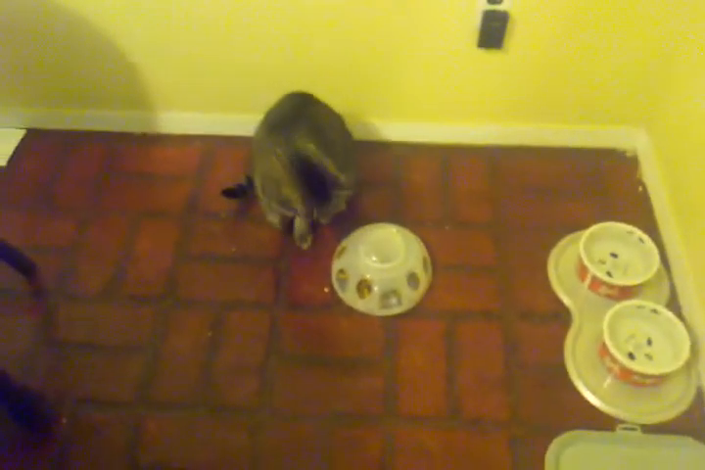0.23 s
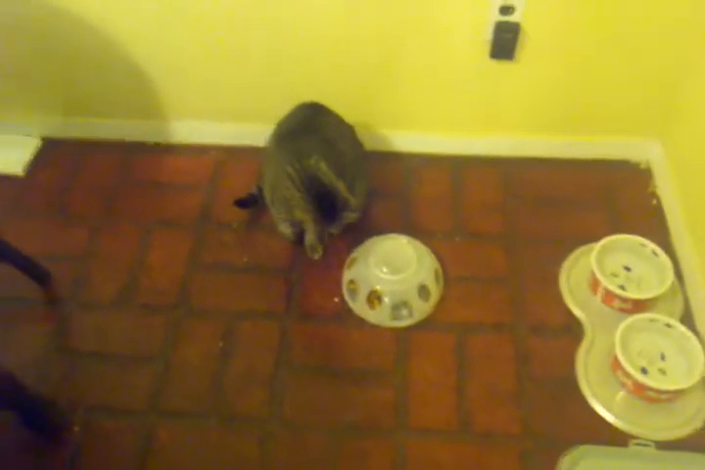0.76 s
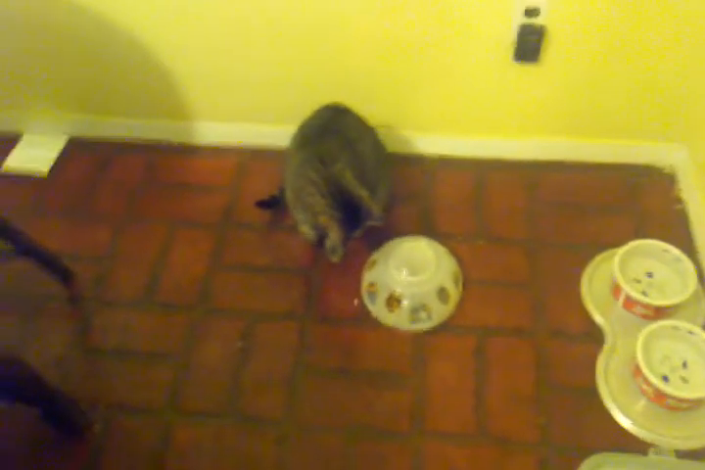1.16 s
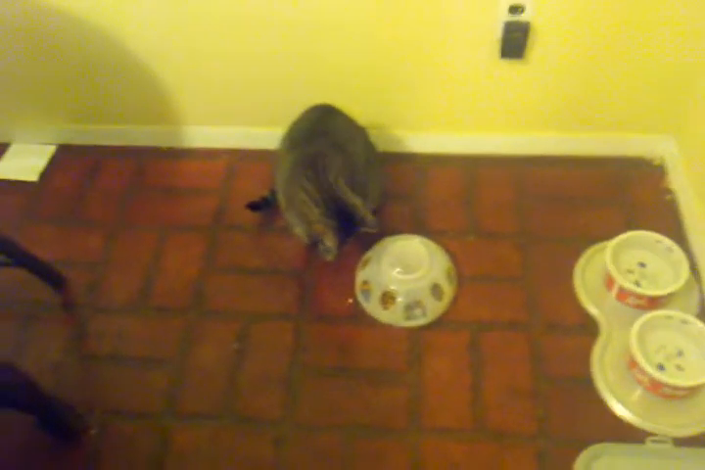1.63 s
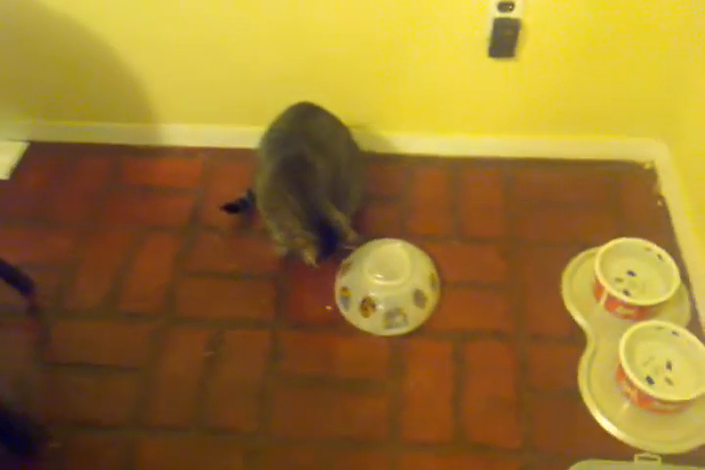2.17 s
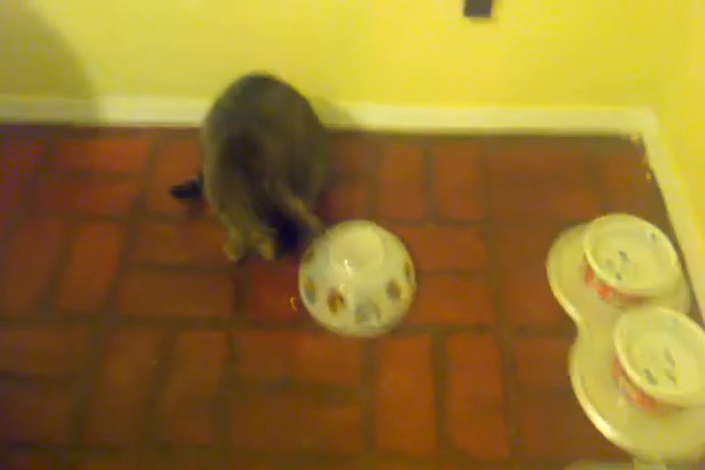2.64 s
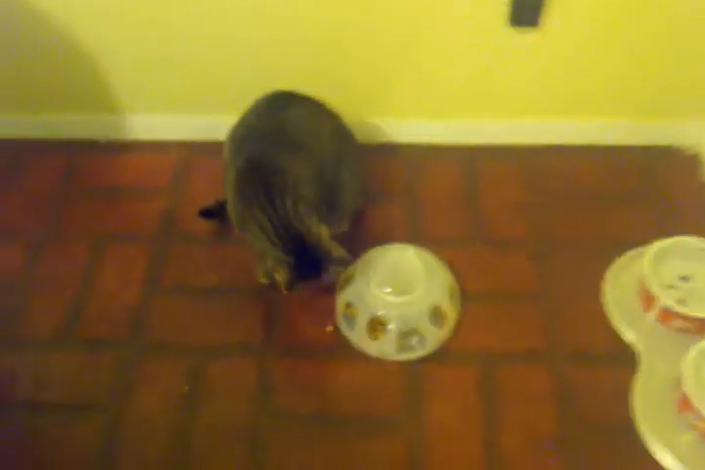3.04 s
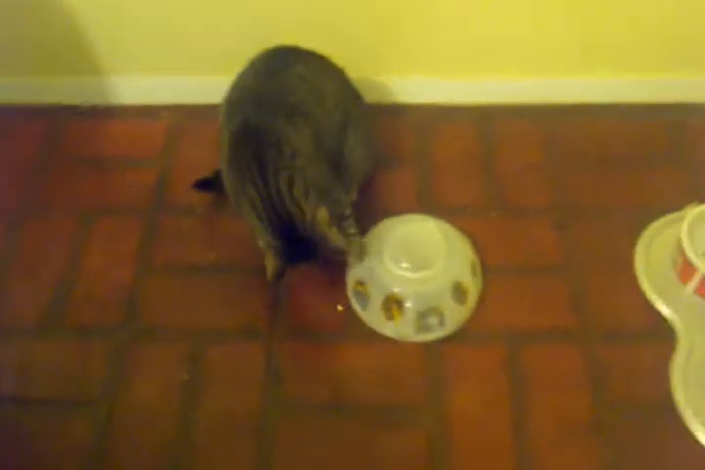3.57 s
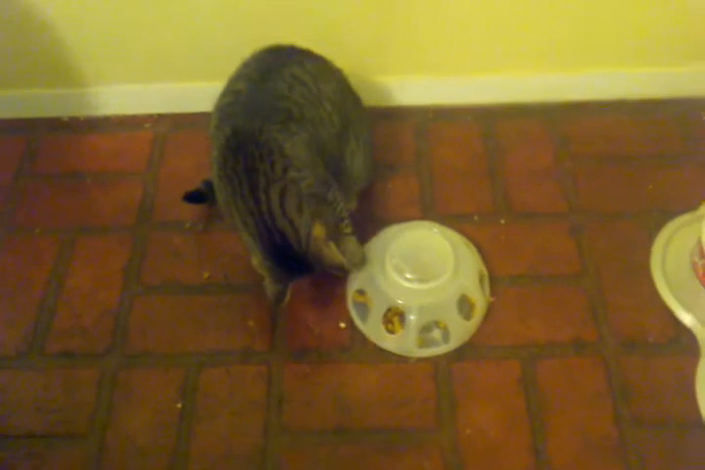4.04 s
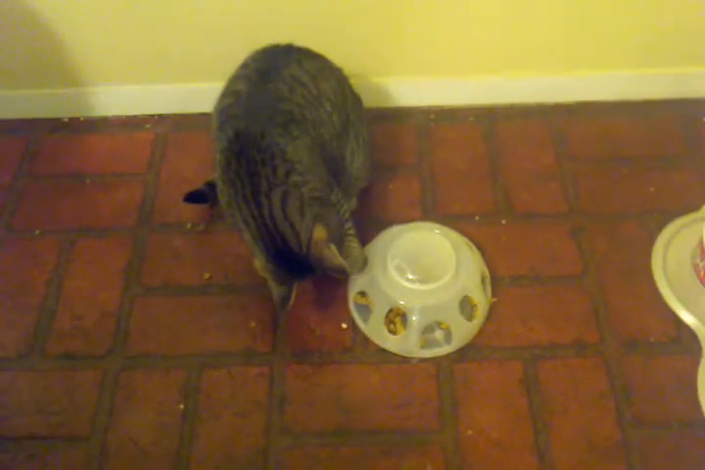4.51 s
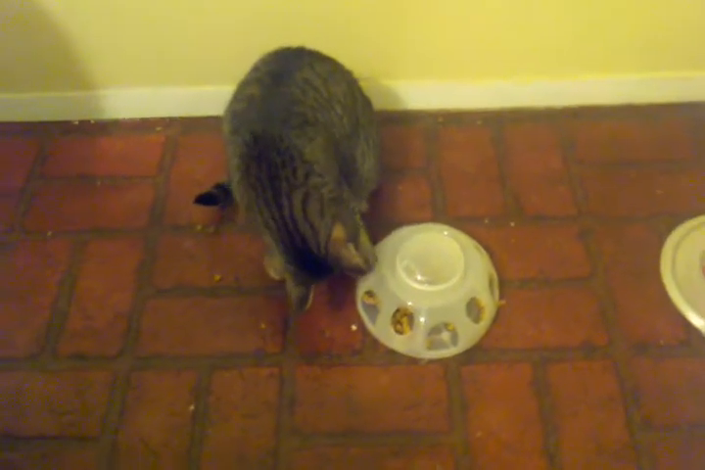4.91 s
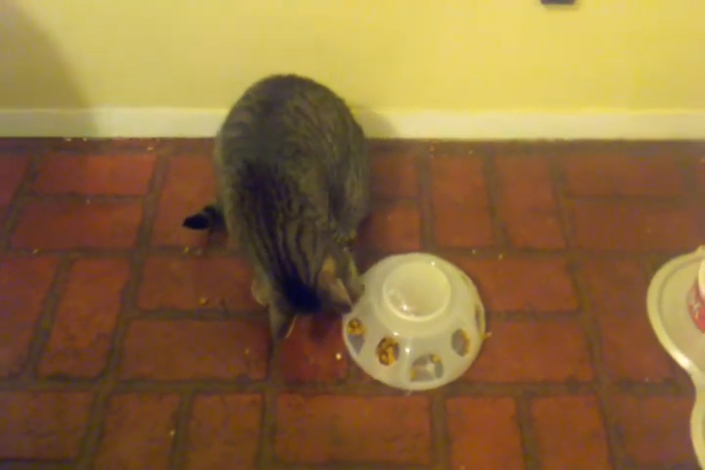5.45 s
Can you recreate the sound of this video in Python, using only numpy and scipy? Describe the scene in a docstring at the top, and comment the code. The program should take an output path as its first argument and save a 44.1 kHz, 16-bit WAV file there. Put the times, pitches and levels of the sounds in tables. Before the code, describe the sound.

Fingers rub and tap close on a camera's case, then a cat crunches dry kibble a little way off in a small room.

```python
"""A hand slides and taps on the camera's case, close and dry, over the faint hiss of two tiny microphones.
Then a cat cracks dry kibble a little way off: each bite is shaped noise that rings pellet and mouth resonances,
with crumbs snapping on and the small room ringing briefly. Skin noise rubs and knocks excite the case's modes.
The camera widens its stereo by subtracting from each port a delayed copy of the other."""
import sys
import numpy as np
from scipy import signal
from scipy.fft import rfft, irfft
from scipy.io import wavfile

SR = 44100
rng = np.random.default_rng(int(sys.argv[2]) if len(sys.argv) > 2 else 0)


def persist_wave(psi):
    """Save psi, clipped to +-1, as 16-bit WAV."""
    counts = np.round(np.clip(psi, -1, 1) * 32767).astype(np.int16)
    wavfile.write(sys.argv[1], SR, np.atleast_2d(counts).T)


N = 250929
T = np.arange(N) / SR  # time (s)
TOP_HZ = 14100  # upper edge of the camera's sound

# resonances that every crunch rings with: f/Hz, width/Hz, relative level/dB
CRUNCH_MODES = [(650, 170, -2.5), (1110, 175, 4.5), (1500, 240, 5), (2115, 190, 7.5)]
# spectrum of a pellet's crack: f/Hz, relative level/dB
CRACK_SPECTRUM = [(1200, -76), (2200, -0.5), (3000, 0.5), (3900, 5), (5200, 2), (6300, 3.5), (8500, -1.5),
                  (10500, -13), (14000, -21)]


def crunches(split_s=0.0014, crumb_s=0.028, crumbs_per_s=1600, strain_s=0.009, chunky_db=2.5,
             detune=0.036, uneven_db=2.5, size=6144):
    """A strained pellet crackles, splits in a short noise burst, then crumbles; split and crumbs ring differently."""
    # bites on a pellet: t/s, hollow ring/dB, mouth resonance f/Hz, crack/dB,
    # crispness/(dB per octave), crumbling/dB re the split
    bites = [(3.494, -49.5, 1850, -54.5, -1, -7), (3.705, -37, 1150, -43, -2, 4),
             (3.717, -51, 1060, -45, 22, -9), (3.7331, -42.5, 2270, -40.5, -4, -22),
             (4.183, -49.5, 955, -45.5, 9, -1.5), (4.218, -62, 2000, -54, -21, -8),
             (4.272, -72, 2100, -53, -9, -8), (4.297, -47.5, 2100, -39, 9.5, -25),
             (4.3314, -54, 1920, -50.5, -11, -1), (4.391, -38.5, 1330, -54, 9, -24),
             (4.417, -50, 1200, -48, -4, 0), (4.4296, -48, 1110, -61, -2, -23),
             (4.4523, -52, 1110, -47.5, 6, 0), (4.6158, -46, 1940, -59, 9, -8),
             (4.629, -55.5, 1146, -55, -6, 2), (4.7197, -54, 1680, -50, -1.5, -7),
             (4.7823, -44.5, 1500, -42, 4, -13), (4.8689, -45, 2100, -49.5, -8, -16),
             (4.888, -51.5, 1500, -48.5, -3, 10), (4.8988, -46.5, 1260, -54.5, 4, 4),
             (4.9413, -63, 1730, -54, -10, -5), (5.0743, -40.5, 1100, -45.5, -12, -3),
             (5.0806, -40, 1400, -37.5, 3, -13), (5.2486, -53.5, 2200, -49, 0, -4),
             (5.2952, -47.5, 1950, -45.5, 2, -7.5), (5.301, -43, 1210, -48, 0, -27),
             (5.5052, -52, 1330, -54.5, -9, 6), (5.568, -45, 1610, -43.5, -4.5, 3),
             (5.5768, -40, 1490, -44, 6, 0), (5.682, -45, 1200, -51, -5, 2.5)]
    accent_peak_db, accent_octaves = 8, 0.35  # the mouth lifts the modes near its resonance
    crack_pivot_hz = 5530  # crispness tilts the crack about this
    lead_s = .024  # room for the crackle ahead of the split
    out = np.zeros((1, N))
    t = T[:size] - lead_s
    crack_hz, crack_shape_db = np.transpose(CRACK_SPECTRUM)
    hz, width, mode_db = np.transpose(CRUNCH_MODES)
    split_swell = np.maximum(t, 0) * np.exp(-abs(t) / split_s)
    crumbling = np.exp(np.minimum(t / strain_s, -t / crumb_s))
    for s, ring_db, mouth_hz, crack_db, crisp_db, crumb_db in bites:
        split, crumb, chunk = rng.standard_normal((3, size))
        crumb *= undb(chunky_db * chunk * (t > 0))
        crumb *= rng.random(size) < crumbs_per_s / SR
        octaves_off = np.log2(hz / mouth_hz)
        accent_db = accent_peak_db * np.exp(-(octaves_off / accent_octaves) ** 2)
        crisp_octaves = np.log2(np.clip(crack_hz / crack_pivot_hz, .5, 1.4))
        crack_dbs = crack_shape_db + crisp_db * crisp_octaves
        hollow, crack = 0, 0
        for force, share in (split * split_swell, 1), (crumb * crumbling, undb(crumb_db)):
            shift, strength = rng.standard_normal((2, len(hz)))
            mode_dbs = mode_db + accent_db + uneven_db * strength
            pellet = modes(zip(hz * (1 + detune * shift), width, mode_dbs))
            uneven_dbs = crack_dbs + uneven_db * rng.standard_normal(len(crack_hz))
            hollow += share * unit(ring(force, pellet))
            crack += share * unit(ring(force, colour(list(zip(crack_hz, uneven_dbs)))))
        add(out, s - lead_s, blow(hollow, ring_db) + blow(crack, crack_db))
    return out


def chewing(start_s=4.15, hollow_db=-62, crack_db=-66, snap_s=.0015):
    """Crumbs keep snapping after the start: sparse noise bursts, each hollow and crisp in uneven measure."""
    crumbs_per_s, spread_db = 22, 3
    snaps = (rng.random(N) < crumbs_per_s / SR) * (T > start_s)
    sizes = undb(spread_db * rng.standard_normal((2, N)))
    force = ring(snaps * sizes, blow(T * np.exp(-T / snap_s), 0))
    hollow, crack = force * rng.standard_normal((2, N))
    hollow = undb(hollow_db) * ring(hollow, modes(CRUNCH_MODES))
    return hollow + undb(crack_db) * ring(crack, colour(CRACK_SPECTRUM))


def room(x, wet_db=-3, early_db=-7, early_s=0.0064, port_hz=4500, size=22050):
    """Direct sound from straight ahead, dense early echoes and a short tail; the ports differ more in the treble."""
    # decay of the room: f/Hz, time to fall by 60 dB/s
    room_decay = [(500, 0.24), (1300, 0.3), (6000, 0.4)]
    t, tail = T[:size], 0
    hz = np.fft.rfftfreq(size, 1 / SR)
    noise = rfft(rng.standard_normal((2, size)))
    centres, t60 = np.transpose(room_decay)
    for share, decay in zip(np.eye(len(t60)), t60):
        band = np.interp(np.log(hz + 1), np.log(centres), share)
        tail = tail + irfft(noise * band) * 1000 ** (-t / decay)
    early = rng.standard_normal((2, size)) * np.exp(-t / early_s) * (t > .001)
    echoes = undb(wet_db) * unit(tail * (t > .005)) + undb(early_db) * unit(early)
    likeness = np.sinc(hz / port_hz)  # of diffuse sound at the two ports
    mid_side = np.sqrt(np.array([1 + likeness, 1 - likeness]) / 2)
    response = irfft(rfft(echoes) * mid_side)
    response[0, 0] += 1  # the direct sound, in mid alone
    return ring(x, response)


def eating_at_ports():
    """Crunches and crumbs in the room, as mid and side; sound from the floor reaches the two ports unequally."""
    # colour of the difference between the ports: f/Hz, relative level/dB
    port_mismatch = [(500, 1), (1200, 0.5), (2200, 11), (3300, 1.5), (6000, 6.2), (12000, 1)]
    mismatch_db = -6.5
    eating = room(crunches() + chewing())
    eating[1] -= ring(eating[0], colour(port_mismatch))[0] * undb(mismatch_db)
    return eating


def rubbing():
    """Skin catches and slips on the case: fine hiss at the ports, coarser rustle through the shell, a short rasp."""
    # strokes of skin over the case: start t/s, length/s, fastest at this share of the length,
    # hiss/dB and case rustle/dB, both ahead of the skin's and shell's own gains
    strokes = [(0.246, 0.12, 0.033, -44.5, -59), (0.324, 0.19, 0.5, -50, -52),
               (0.514, 0.36, 0.14, -33.5, -50), (0.54, 0.058, 0.15, -26.5, -60),
               (0.79, 0.29, 0.63, -39, -43), (0.987, 0.1, 0.63, -50, -43.5),
               (1.108, 0.15, 0.18, -44.5, -53.5), (1.332, 0.15, 0.53, -58, -66),
               (1.498, 0.22, 0.56, -50, -56.5), (1.661, 0.1, 0.63, -34, -52),
               (1.699, 0.25, 0.41, -44.5, -55), (1.884, 0.3, 0.5, -38, -48.5),
               (1.952, 0.11, 0.14, -41, -51), (2.154, 0.2, 0.71, -42, -50), (2.358, 0.082, 0.6, -54, -67),
               (2.381, 0.24, 0.73, -53.5, -61.5), (2.647, 0.12, 0.75, -59.5, -68),
               (2.847, 0.75, 0.38, -60, -65)]
    # hiss of sliding skin at the two ports: f/Hz, relative level/dB in their sum, in their difference
    skin_spectra = [(1100, -21.5, -23), (2000, -5, -2.5), (3410, -45, -7.5), (3445, -6.5, -1),
                    (4980, -7.5, -0.5), (5900, 4, -2.5), (6920, -0.5, 8), (8930, 6.5, 5), (10130, -7.5, 0),
                    (11800, -2, -2.5), (13000, -10, -6)]
    # what the thin shell passes: f/Hz, relative level/dB
    shell = [(2600, 7), (3300, -79), (4500, 5.5), (8000, -2)]
    # what the rubbed case rings with: f/Hz, width/Hz, level/dB before it wanders
    case_modes = [(342, 280, -15.5), (600, 133, -9), (1243, 650, -3), (1520, 440, -1), (2100, 1730, 1),
                  (2380, 5100, -3.5)]
    # what a rasping fingertip rings with: f/Hz, width/Hz, relative level/dB
    rasp_modes = [(1500, 100, -10), (3920, 400, -2), (8040, 490, 6.5), (10400, 700, -16), (13000, 510, -4)]
    hiss_law, rustle_law = 1.67, 1.1  # growth with the speed of a stroke (exponents)
    # a stronger stroke hisses brighter: neutral level (dB), tilt gained (dB per octave per dB), pivot (Hz)
    firm_db, brightening, pivot_hz = -48, 0.15, 7500
    patchy_db = 1.2  # each stroke finds another patch of skin and case: spread of its colour
    # a fingertip grips harder and rasps once
    rasp_start_s, rasp_length_s, rasp_peak, rasp_db = 1.668, 0.094, 0.67, -33

    hiss, rustle_power, rasp_level = np.zeros((2, N)), np.zeros(N), np.zeros(N)
    fine = grains(per_s=9000, spread_db=-1.1) * undb([[2.5], [1.5]])  # mid, side (dB)
    skin_hz, *skin_dbs = np.transpose(skin_spectra)
    for start_s, length_s, peak, hiss_db, rustle_db in strokes:
        speed = stroke(length_s, peak)
        bright_db = brightening * (hiss_db - firm_db) * np.log2(skin_hz / pivot_hz)
        tint_db = bright_db + patchy_db * rng.standard_normal(len(skin_hz))
        skin = np.array([colour(list(zip(skin_hz, db + tint_db))) for db in skin_dbs])
        patch = np.roll(fine, rng.integers(N), axis=1)[:, :len(speed)]
        add(hiss, start_s, ring(patch, skin) * undb(hiss_db) * speed ** hiss_law)
        add(rustle_power, start_s, (undb(rustle_db) * speed ** rustle_law) ** 2)

    slips = ring(grains(per_s=3000, spread_db=0.5), colour(shell)) * undb([[-5.5], [-6.2]])
    rustle = 0
    # the contact point travels, so the modes of the shell come and go
    for k, (hz, width, db) in enumerate(case_modes):
        rustle = rustle + (-1) ** k * ring(slips, modes([(hz, width, 0)])) * undb(db + walk(7.4))

    add(rasp_level, rasp_start_s, undb(rasp_db) * stroke(rasp_length_s, rasp_peak) ** hiss_law)
    rasp = ring(grains(per_s=13000, spread_db=0.0) * stick_slip(), modes(rasp_modes))
    rasp = rasp * undb([[0], [-3]]) * rasp_level
    grip_db = 1.0 * walk(110)
    return (drift(hiss + rustle * np.sqrt(rustle_power)) + rasp) * undb(grip_db)


def stroke(length_s, peak):
    """Speed of a sliding finger, 0-1: it breaks loose, is fastest near a share of the way and stops."""
    break_loose_s = 0.012
    t = T[:int(length_s * SR)]
    warp = np.log(.5) / np.log(np.clip(peak, .02, .95))  # puts the top of the sine at the peak
    swing = np.sin(np.pi * (t / length_s) ** warp)
    return swing * (1 - np.exp(-t / break_loose_s))


def stick_slip():
    """Uneven saw of the gripping fingertip: each slip starts at once and dies away; rms near one."""
    slips_per_s, jitter = 190, .3
    slip_share = .55  # decay of a slip, as a share of its cycle
    rate = slips_per_s * np.exp(jitter * walk(slips_per_s))
    phase = np.cumsum(rate) / SR % 1
    return unit(np.exp(-phase / slip_share)) * np.sqrt(N)


def grains(per_s, spread_db):
    """Dense tiny slips of uneven size, as mid and side at the ports; rms near one."""
    hits = (rng.random((2, N)) < per_s / SR) * rng.choice([-1, 1], (2, N))
    sizes = undb(spread_db * np.minimum(rng.exponential(size=(2, N)), 4))
    return unit(hits * sizes) * np.sqrt(N)


def taps(chatter_db=-8, chatter_s=0.005, tick_s=0.0093, snap_db=-3, bend_s=0.00125, size=2048):
    """A fingertip knocks the case, which chatters and thumps; the skin snaps, then hisses as it slips."""
    # finger taps and slips: t/s, then levels/dB ahead of the port gains: knock, tick, lower thump, upper thump
    tap_rows = [(0.23, -68, -72, -68, -60), (0.2532, -52.5, -44, -56, -55.5),
                (.541, -40.5, -32.5, -85, -58), (0.7608, -53, -43.5, -82, -69), (.847, -58, -70, -55, -63),
                (0.8596, -45, -66, -59, -50), (1.198, -47, -70, -71, -69), (1.21, -47.5, -77, -53.5, -56.5),
                (1.228, -48, -75, -53, -61), (1.262, -48.5, -64, -55, -58.5),
                (1.3046, -52, -80, -67, -55.5), (1.4725, -49, -43.5, -88, -70),
                (1.611, -51.5, -53, -51, -61), (1.9572, -42, -38.5, -52, -86), (2.073, -36, -54, -62, -68),
                (2.108, -38, -37.5, -69, -82), (2.1593, -37, -37, -64, -75), (2.223, -35, -33, -52, -63),
                (2.2933, -36.5, -37, -50, -74), (2.35, -67, -46, -72, -85), (2.4215, -74, -55, -78, -84),
                (3.877, -46, -51, -75, -58)]
    # spectrum of a knock on the case: f/Hz, relative level/dB
    case_knock = [(80, 17.5), (250, -1), (550, 10.5), (900, 6.5), (1400, 7), (2000, 10), (2700, 2),
                  (3400, -11.5), (4500, -22), (8000, -7)]
    # spectrum of the tick of slipping skin: f/Hz, relative level/dB
    tick_spectrum = [(1500, -14), (3000, 8), (4600, 6), (6300, 16), (8200, 12), (11000, 2), (14000, 10)]
    # the two lowest modes of the case, which a tap sets ringing: f/Hz, width/Hz
    thump_modes = [(315, 110), (660, 100)]
    # a harder tap is brighter: neutral knock level (dB), tilt gained (dB per octave per dB)
    firm_db, brightening = -34.5, 0.35
    out, t = np.zeros((2, N)), T[:size]
    tick = colour(tick_spectrum)
    # bending waves in the shell: the lows travel slower and arrive last (bend_s is the travel time at 1 kHz)
    hz_bins = np.fft.rfftfreq(size, 1 / SR)
    travel = np.exp(-4j * np.pi * bend_s * np.sqrt(1000 * hz_bins))
    for s, knock_db, tick_db, *thump_dbs in tap_rows:
        chatter, slip = rng.standard_normal((2, 2, size))
        chatter = unit(chatter * np.exp(-t / chatter_s) * (t > .0015))
        push = (t == 0) + undb(chatter_db) * chatter
        case = colour(tilt(case_knock, brightening * (knock_db - firm_db)))
        knock = ring(irfft(rfft(push) * travel), case)
        add(out, s - bend_s / 2, blow(knock, knock_db) * undb([[4.0], [2.5]]))
        for (hz, width), db in zip(thump_modes, thump_dbs):
            add(out, s, blow(modes([(hz, width, 0)]), db) * undb([[6], [-3]]))
        slip_s = tick_s * np.sqrt(undb(knock_db - firm_db))  # a firmer tap slips for longer
        snap = undb(snap_db) * (t == 0) + unit(slip * np.exp(-t / slip_s))
        add(out, s - bend_s / 2, blow(ring(snap, tick), tick_db) * undb([[.8], [-.8]]))
    return out


def tilt(points, db_per_octave, pivot_hz=1400):
    """Lean a spectrum about a pivot: a softer contact is duller."""
    return [(hz, db + db_per_octave * np.log2(np.clip(hz, 250, 4000) / pivot_hz)) for hz, db in points]


def bumps(swell_s=0.019, width_hz=125, size=4096):
    """Soft, dull bumps as the grip shifts: swelling noise through one broad resonance each."""
    # bumps: t/s, level/dB ahead of the port gains, centre f/Hz
    bump_rows = [(3.246, -59.5, 327), (3.276, -60, 620), (3.786, -54, 268), (3.824, -58, 200)]
    out, t = np.zeros((2, N)), T[:size]
    for s, db, hz in bump_rows:
        push = rng.standard_normal((2, size)) * t * np.exp(-t / swell_s)
        add(out, s, blow(ring(push, modes([(hz, width_hz, 0)])), db) * undb([[14], [3]]))
    return out


def microphone_hiss():
    """Faint hiss, unrelated at the two ports; practically steady, after a short fade-in."""
    # spectrum of the hiss: f/Hz, relative level/dB
    hiss_spectrum = [(40, 6), (70, 4), (120, 4.5), (300, -2), (500, -6), (800, -14.5), (2500, -22.5),
                     (5000, -26), (8000, -17.5), (11000, -20), (14000, -22.5)]
    hiss = ring(rng.standard_normal((2, N)), colour(hiss_spectrum)) * undb([[-55.5], [-55.5]])
    return drift(hiss, depth_db=0.06, rate=18) * undb(np.interp(T, [0, .3], [-3.5, 0]))


def drift(x, depth_db=2.5, rate=30, count=12):
    """Let the level of each band of a sound wander on its own, by a given depth."""
    size = 2 ** 18
    log_hz = np.log(np.fft.rfftfreq(size, 1 / SR) + 1)
    place = np.interp(log_hz, np.log([500, TOP_HZ]), [0, count - 1])
    spectrum = rfft(x, size)
    out = 0
    for k in range(count):
        band = irfft(spectrum * np.maximum(1 - abs(place - k), 0))[:, :N]
        out = out + band * undb(depth_db * walk(rate))
    return out


def walk(rate):
    """Random wander in straight lines between knots (rate: knots per second), with a spread near one."""
    knots = rng.standard_normal(4000)
    return np.interp(T * rate, np.arange(len(knots)), knots)


def undb(db):
    """Decibels to gain."""
    return 10 ** (np.asarray(db) / 20)


def unit(x):
    """Scale to an energy of one."""
    return x / np.sqrt(np.sum(x ** 2, axis=-1, keepdims=True) + 1e-18)


def blow(x, db):
    """Give a short sound the energy of 6 ms at this level."""
    return unit(x) * undb(db) * np.sqrt(.006 * SR)


def add(track, s, sound):
    """Mix a sound in at a time."""
    i = int(np.clip(s * SR, 0, N - 1))
    track[..., i:i + sound.shape[-1]] += sound[..., :N - i]


def ring(x, response):
    """Pass a sound through an impulse response."""
    return signal.fftconvolve(np.atleast_2d(x), np.atleast_2d(response), axes=-1)[:, :x.shape[-1]]


def modes(rows, size=2048):
    """Impulse response of damped resonances, each a decaying sine; rows of f/Hz, width/Hz, level/dB."""
    t = T[:size]
    out = 0
    for hz, width, db in rows:
        out = out + undb(db) * unit(np.exp(-np.pi * width * t) * np.sin(2 * np.pi * hz * t))
    return unit(out)


def colour(points, size=1024):
    """Causal (minimum-phase) impulse response with a given spectrum (f/Hz, dB), at an energy of one."""
    hz, db = np.transpose(points)
    bins_hz = np.arange(size // 2 + 1) * SR / size
    gain = undb(np.interp(np.log(bins_hz + 1), np.log(hz), db))
    cepstrum = irfft(np.log(gain))
    # fold the cepstrum onto positive time
    cepstrum[1:size // 2] *= 2
    cepstrum[size // 2 + 1:] = 0
    return unit(irfft(np.exp(rfft(cepstrum))))


def scene():
    """Sound pressure at the left and right ports."""
    mid, side = rubbing() + taps() + eating_at_ports() + bumps() + microphone_hiss()
    return np.array([mid + side, mid - side])


def record(dry, low_hz=100, size=2 ** 18):
    """Each channel is its port minus the delayed other port, which combs the sound; bass and top are cut."""
    # share of the other port that is subtracted: f/Hz, level/dB
    cross_feed = [(60, -.4), (3300, -.1), (4400, -1.3), (6000, -5.3), (14000, -6.5)]
    cross_lag, right_db = 15, .5  # delay (samples), gain of the right channel over the left
    hz = np.fft.rfftfreq(size, 1 / SR)
    share = undb(np.minimum(np.interp(hz, *np.transpose(cross_feed)), 0))
    delay = np.exp(-2j * np.pi * hz * cross_lag / SR)
    other = irfft(rfft(dry[::-1], size) * share * delay)[:, :N]
    wide = (dry - other) / 2 * undb([[0], [right_db]])
    wide = signal.sosfilt(signal.butter(2, low_hz, "high", fs=SR, output="sos"), wide)
    return signal.sosfilt(signal.ellip(10, .2, 70, TOP_HZ, fs=SR, output="sos"), wide)


dry = scene()
out = record(dry)
persist_wave(out)
```